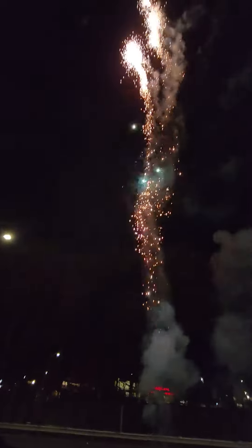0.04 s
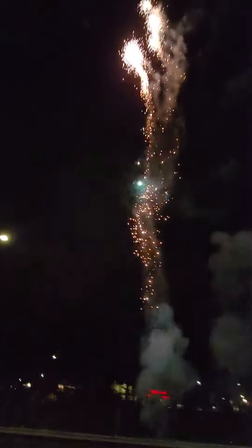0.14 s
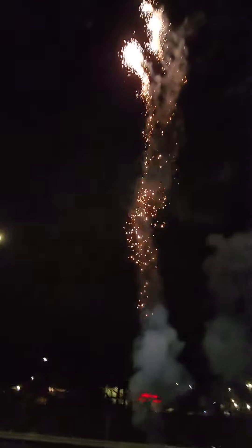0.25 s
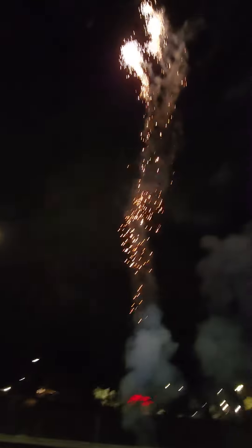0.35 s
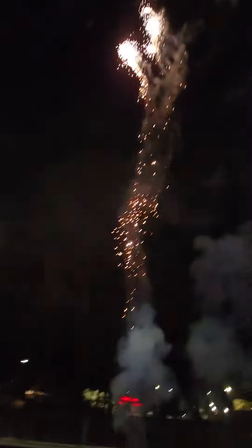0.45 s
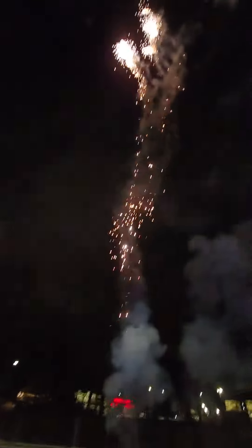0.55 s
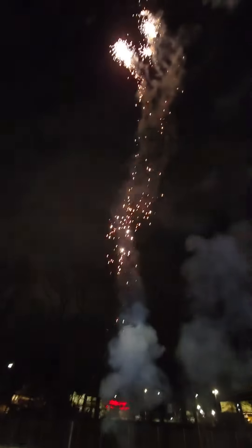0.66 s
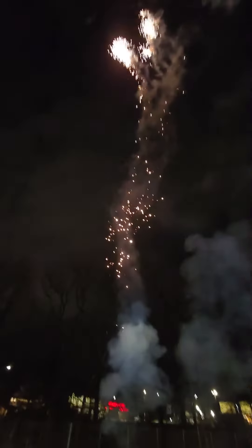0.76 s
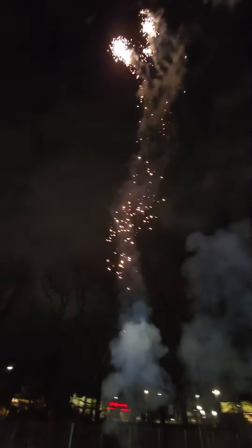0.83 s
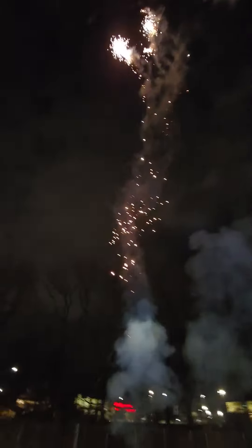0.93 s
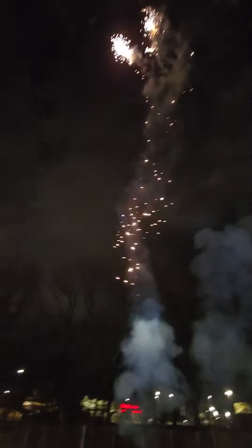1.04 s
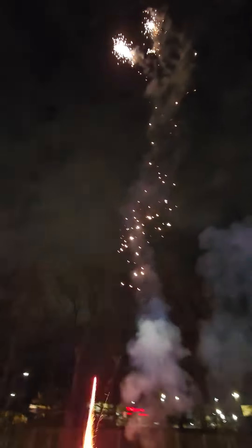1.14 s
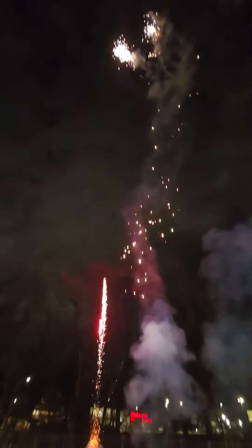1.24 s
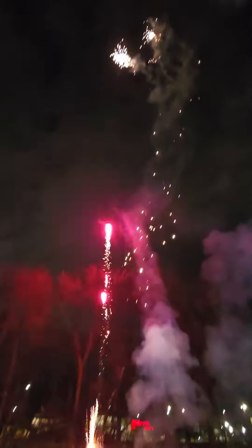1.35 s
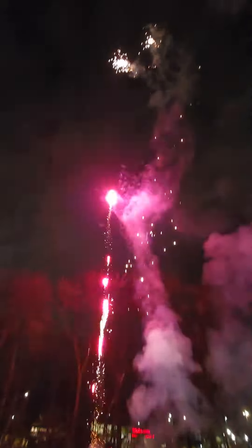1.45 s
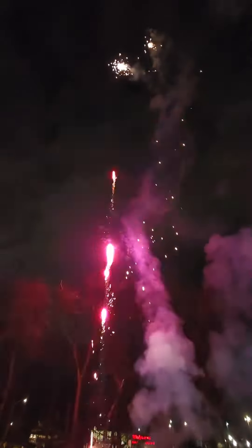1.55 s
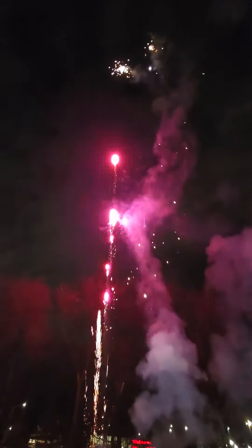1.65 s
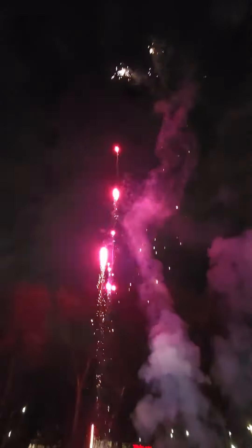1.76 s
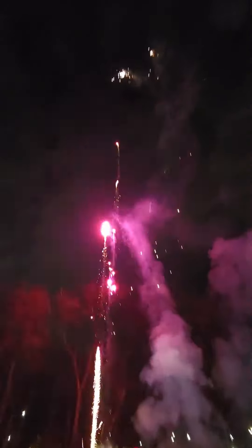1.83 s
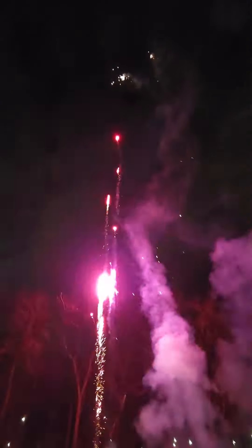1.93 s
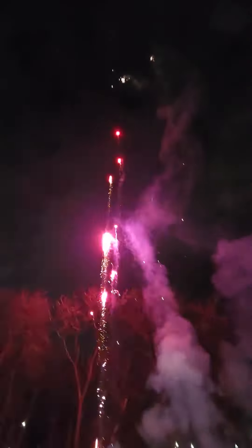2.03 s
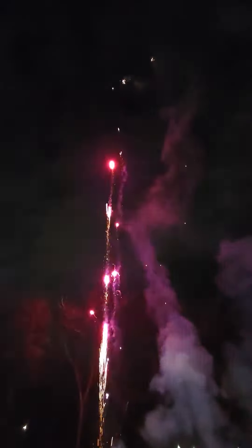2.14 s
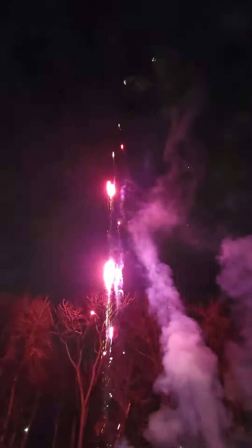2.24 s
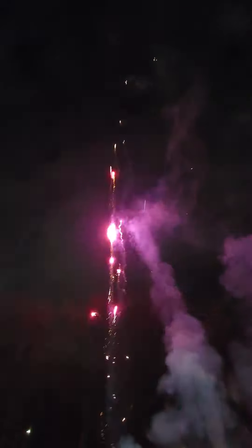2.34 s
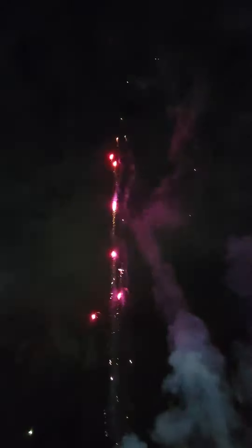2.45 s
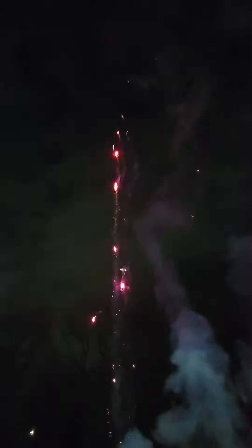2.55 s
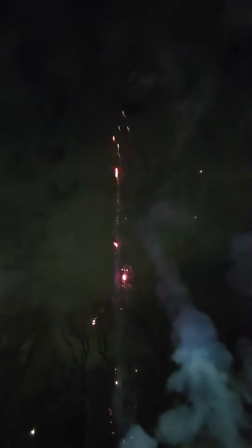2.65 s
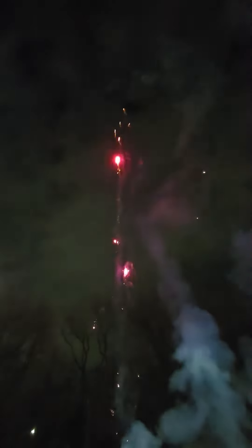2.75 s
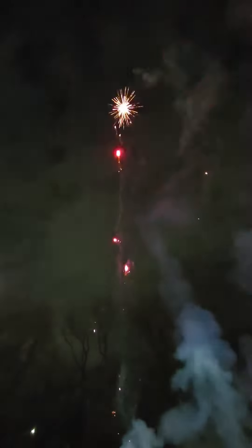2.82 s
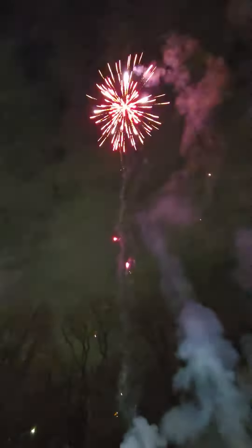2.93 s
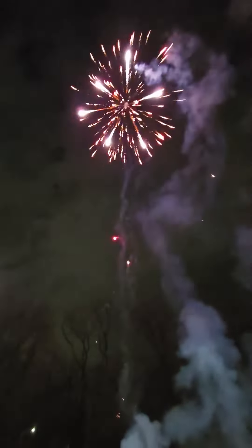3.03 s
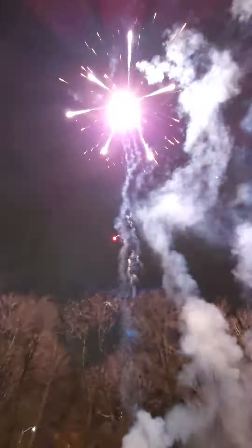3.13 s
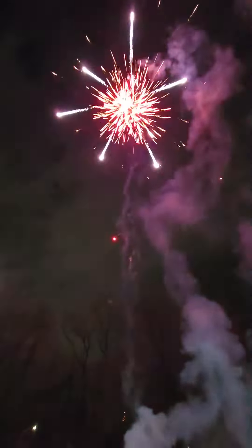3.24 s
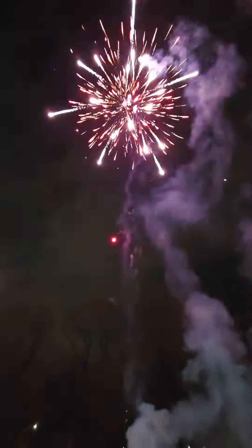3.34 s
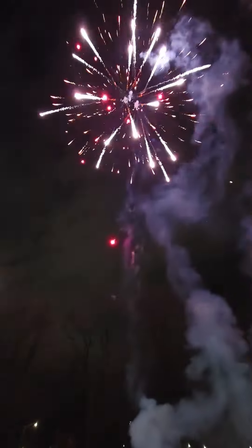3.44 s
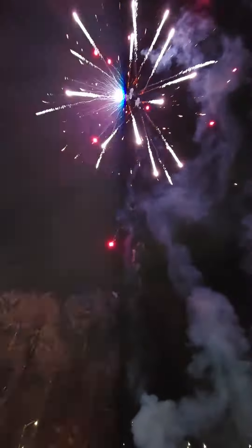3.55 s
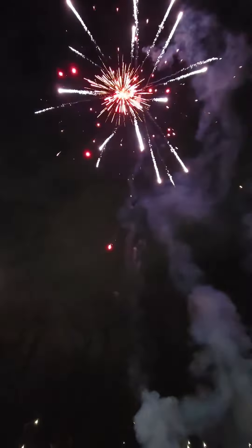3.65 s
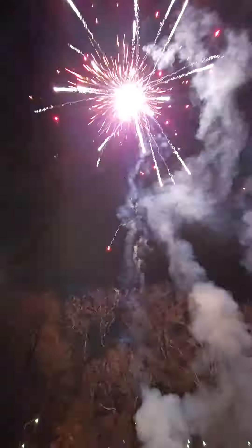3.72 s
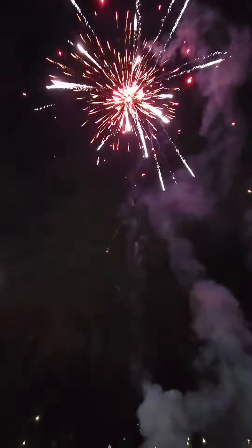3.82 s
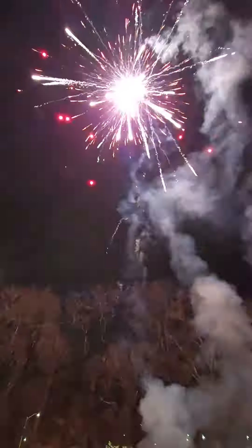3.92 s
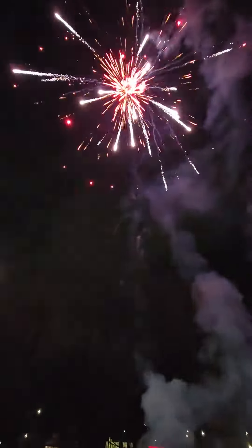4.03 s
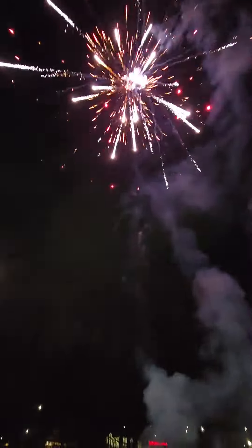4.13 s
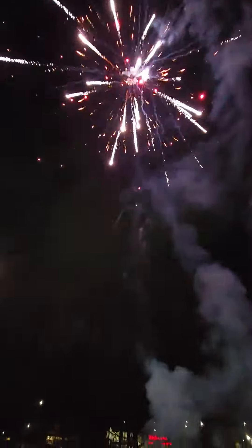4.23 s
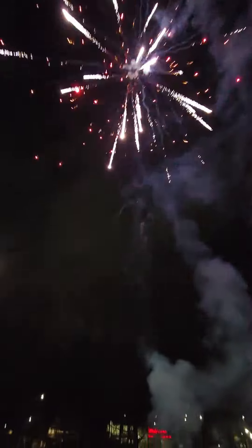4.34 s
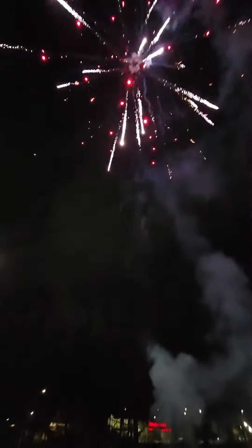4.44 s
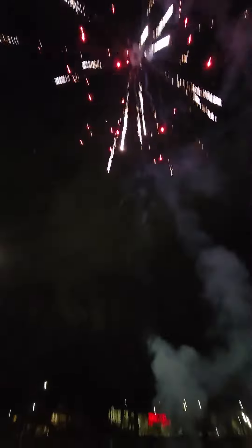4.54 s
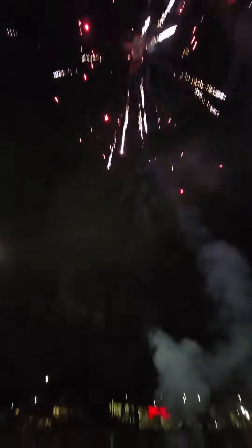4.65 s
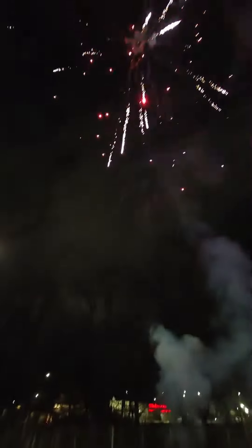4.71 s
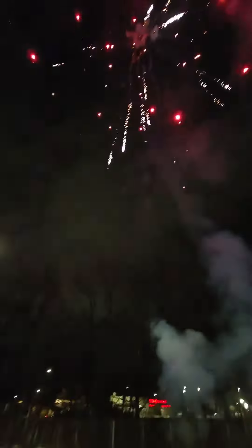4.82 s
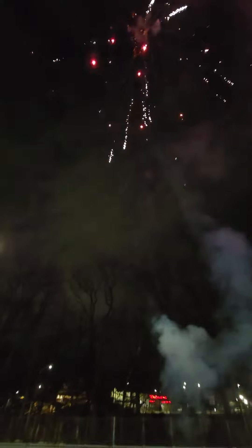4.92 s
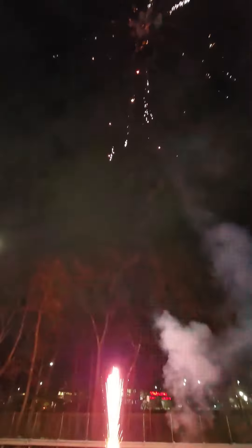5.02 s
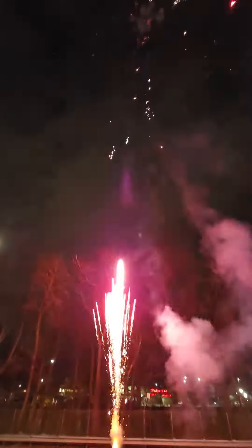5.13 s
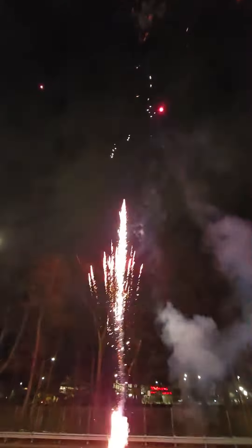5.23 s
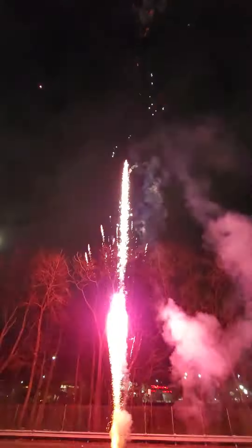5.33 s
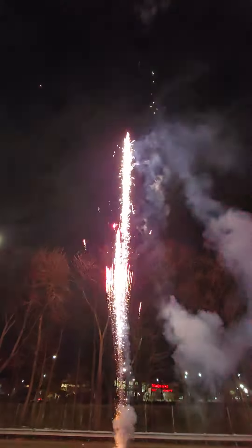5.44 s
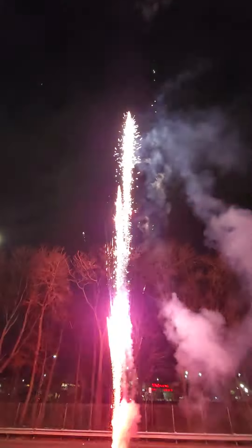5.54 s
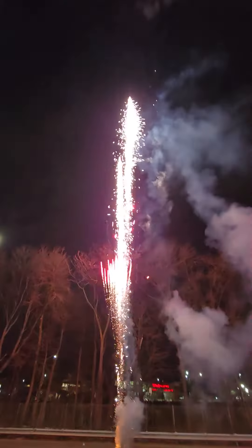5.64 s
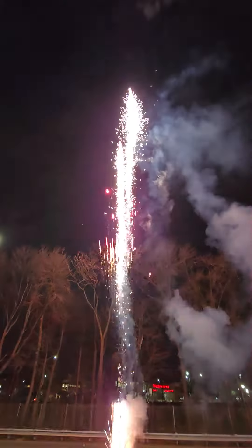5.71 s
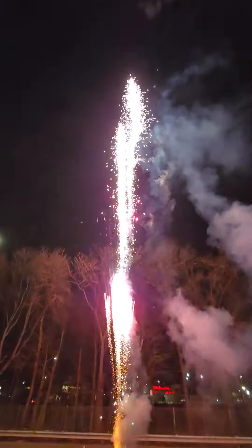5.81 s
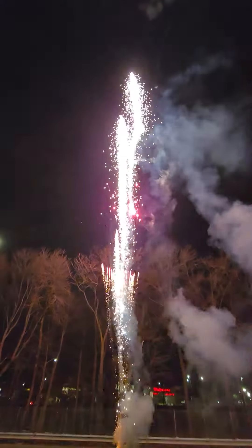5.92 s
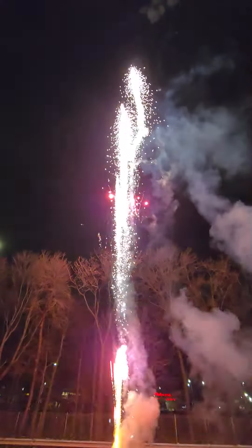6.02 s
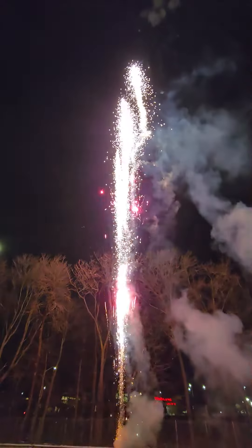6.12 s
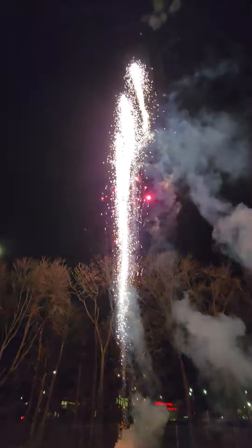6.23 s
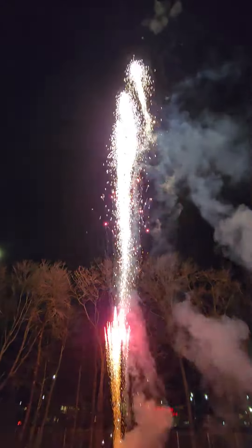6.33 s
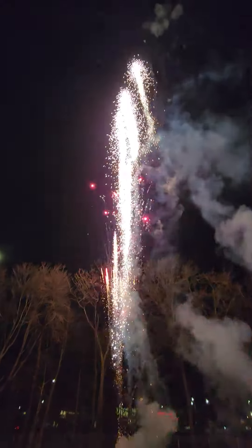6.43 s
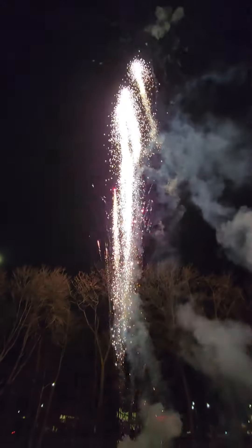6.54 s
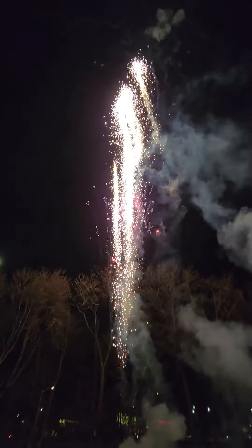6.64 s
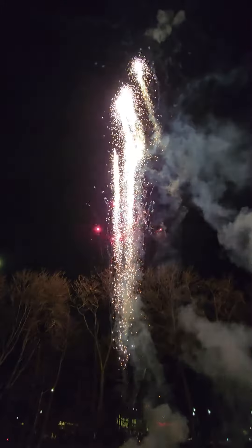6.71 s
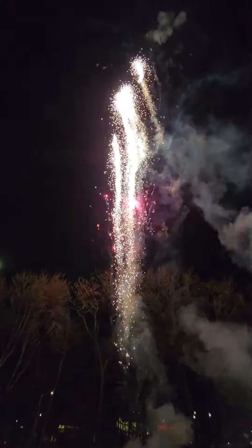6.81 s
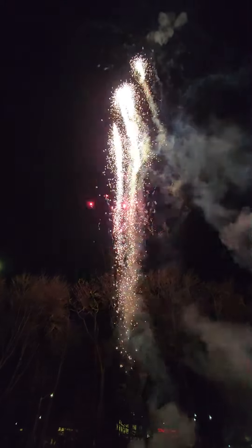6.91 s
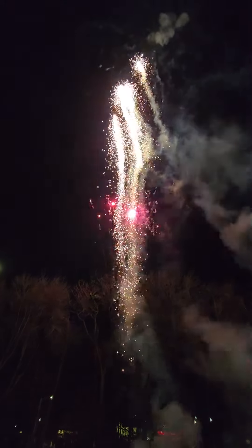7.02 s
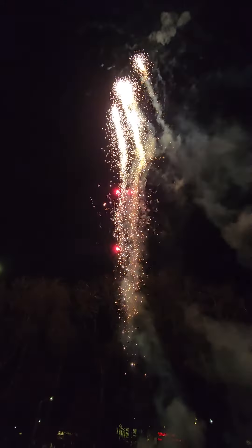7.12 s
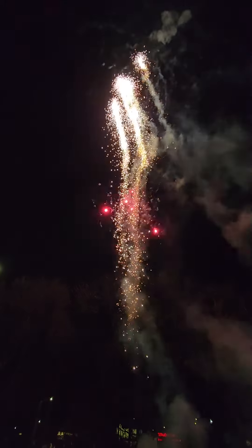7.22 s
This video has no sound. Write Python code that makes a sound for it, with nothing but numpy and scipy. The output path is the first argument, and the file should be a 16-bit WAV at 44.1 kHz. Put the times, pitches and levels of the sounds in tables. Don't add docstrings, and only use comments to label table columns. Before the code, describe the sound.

Glittering firework trails hiss and crackle through wind buffets, then hard launch bangs, sharp aerial bursts and another string of launches echo along a street.

```python
import sys
import numpy as np
from scipy import signal
from scipy.io import wavfile

SR = 44100
rng = np.random.default_rng(int(sys.argv[2]) if len(sys.argv) > 2 else 0)


def dump_mix(stems):
    frames = np.atleast_2d(stems).T
    limited = np.clip(frames, -1, 1)
    pcm = np.round(limited * 32767).astype(np.int16)
    wavfile.write(sys.argv[1], SR, pcm)


def nominal_scale(level):
    x = np.asarray(level, float) / 20
    return 10 ** x


N = 320607

# t/s, shock level/dB, street reply level/dB, fence level/dB
SHELL_LIFTS = [(1.2353, -9.5, -15.5, .5), (1.4372, -8, -20, -2), (1.6576, -8, -20.5, -2.5),
               (1.846, -7.5, -25, .5), (1.9004, -9, -22, 1.5), (2.1185, -7, -24, 1.5)]
BURSTS = [(3.0415, -10, -19, .1), (3.3427, -9, -20.5, .1), (3.3688, -7, -23, .1), (3.8429, -9, -21, .1),
          (3.9729, -5.5, -22, .1), (4.1867, -7.5, -22.5, .1)]
COMET_LIFTS = [(5.1151, -10.5, -29, 4), (5.345, -10, -32.5, -4), (5.5716, -6.5, -29, -2),
               (5.8192, -8, -28.5, -1), (6.083, -9.5, -27.5, 2), (6.3532, -6.5, -25.5, -1)]
# gas swing f/Hz, swing duration/ms, blast level/dB, blast push/ms, ring f/Hz, ring level/dB,
# fizz level/dB, fence level/dB, front dulled above f/Hz
SHELL_PULSE = (275, 4.5, 1, 0.14, 2200.5, -8, -9, -3, 6000)
BURST_PULSE = (367, 3.4, 4, 0.55, 2597.5, -12, -12, -24, 9000)
COMET_PULSE = (243, 4.5, 10.5, 0.3, 3402, -11, -13, -15, 7500)
# delay after the shock/ms, level/dB, lag of left behind right/ms, left-right level/dB, dulled above f/Hz
LIFT_PATHS = [
    (0, 0.5, 0.4157, -2, 14700),
    (3.653, -8, -0.23, -9, 7900),
    (16.57, -2, 0.13, 3.53, 1100),
    (37.4, -5, 0.24, 0, 940),
    (56.6, -17, .1, 7, 410),
    (92.07, -17, -0.0077, -5, 6700),
]
BURST_PATHS = [
    (0, 0.5, -.3, -1.6, 15000),
    (5.94, 2.3, 0.52, 0.42, 15000),
    (10.84, 1, 0.136, 1.5, 610),
    (14.17, -8.5, -0.076, .1, 640),
    (24.5, -14, 0.066, 0.1, 15000),
    (29.89, -8, 0.2, .1, 440),
    (36.3, -10.5, .1, 0.1, 640),
    (41.9, -12.5, 0.17, 0.1, 2200),
]
COMET_PATHS = [
    (0, 0, 0.352, 0.1, 15000),
    (3.33, -13.5, -0.436, 0.1, 5700),
    (16.4, -13, 0.04, 0.1, 820),
    (36.96, -12.5, 0.15, 0.1, 760),
    (55.86, -22, 0.092, 0.1, 550),
]
FENCE_MS, FENCE_SPREAD_MS, FENCE_HZ = 14.2, 7.0, 2200
# delay/ms, level/dB
FENCE_REPEATS = [
    (21, -9),
    (43, -14),
]
# f/Hz, level per Hz/dB
SHELL_REPLY = [(24, -40), (40, -14), (256, 0), (345, -10), (585, -8.5), (1070, -14.5), (1270, -15.5),
               (1600, -14.5), (2100, -17.5), (2440, -20), (3740, -22.5), (16000, -43)]
BURST_REPLY = [(24, -55), (45, -20.5), (110, -13.5), (175, -6), (300, -4), (400, -2.5), (630, -13),
               (950, -15), (1400, -17), (2210, -18.5), (2700, -23.5), (3930, -27), (16000, -46)]
COMET_REPLY = [(24, -45), (40, -24), (249, -2.5), (329, -13), (529, -7.5), (770, -14.5), (1040, -18.5),
               (1340, -22.5), (2050, -20), (3400, -24.5), (16000, -46)]
# f/Hz, near T60/s, far T60/s, far level/dB
GROUND_DECAY = [(60, 1, 2.4, -11), (250, 0.55, 1.33, -13), (1000, 0.81, 1.89, -11), (3000, 0.518, 1.34, -8),
                (8000, 0.55, 0.54, -10.5), (15000, 0.31, 0.54, -8)]
AIR_DECAY = [(60, 0.5, 4.5, 9), (160, 0.16, 3.2, -12), (400, 0.41, 3, -15.5), (1200, 0.33, 3.03, -18),
             (3000, 0.36, 1.89, -10.5), (8000, 0.51, 0.7, -8), (15000, 0.19, .6, -12.5)]
FAR_ROW_MS, FAR_ROW_SPREAD_MS = 99.5, 47
# f/Hz, correlation/1
LIKENESS = [(60, 0.945), (130, 0.976), (290, 0.876), (640, 0.17), (1410, -0.19), (3100, 0.112),
            (6820, 0.0018), (15000, 0.079)]
# f/Hz, left-right level/dB
PORT_BALANCE = [(60, 0), (130, -0.5), (290, -0.5), (640, 1), (1410, -2), (3100, -1), (6820, 2), (15000, 0)]
# f/Hz, width/Hz, lift/dB
PORT_PEAKS = [(2170, 220, 2.2), (3600, 700, 1.2), (1000, 200, 1.2)]
# t/s, hiss level/dB, brightness/(dB per octave)
FADING = [
    (0.0, -25.5, 0.14),
    (0.232, -25.5, 0.35),
    (0.596, -27.5, -0.3),
    (0.828, -29.5, -0.26),
    (1.396, -32.5, -1.2),
    (1.7, -42, -4.5),
]
RISING = [
    (5.15, -69.5, 0.1),
    (5.28, -67, 0.1),
    (5.62, -43.5, 0.091),
    (5.75, -36.5, 0.112),
    (5.91, -34.5, 0.113),
    (6.3, -30, 0.13),
    (6.6, -28.5, 0.097),
    (7.27, -28.5, 0.043),
]
# f/Hz, level per Hz/dB
FADING_HISS = [(40, -17.5), (80, -8), (130, -16), (190, -8.5), (260, -14.5), (450, -6), (882, -5),
               (1360, -3), (2160, 0), (3050, -1.5), (3760, -4), (5500, -6.5), (9070, -12), (15100, -26),
               (17000, -29)]
RISING_HISS = [(60, -30), (110, -18.5), (170, -6), (343, -6.5), (667, -4.5), (1190, -5), (1500, -2.5),
               (2200, -1.5), (3400, -3), (5160, -7), (8940, -8.5), (15000, -16), (17000, -19)]
# f/Hz, level per Hz/dB
NIGHT = [(29, -30.5), (50, -3), (96, -18), (229, -6.5), (337, -25.5), (615, -13.5), (2060, -27),
         (2680, -35), (5810, -49.5), (6390, -50), (16000, -61)]
NIGHT_DB, MIC_HISS_DB = -50.5, -76.5
# f/Hz, width/Hz, level/dB
DRONE = [(185, 30, -46.5), (360, 38.4, -46)]
# peak t/s, level/dB, build-up/ms, sign/1, left-right level/dB
SWELLS = [
    (1.2316, -14, 5.6, 1, -16),
    (1.2362, -15, .9, -1, -16),
    (3.0375, -13, 1.6, -1, -7),
    (5.1135, -22, 2.5, 1, -12),
    (5.1158, -16, .9, -1, -12),
]
# peak t/s, level/dB, build-up/s, fall/(s per 10 dB)
GUSTS = [
    (.1, -46, .05, .3),
    (.33, -25, .04, .1),
    (.43, -29, .06, .045),
    (.8, -52, .05, .15),
    (1.03, -44, .04, .05),
    (6.92, -52, .1, .05),
]
BREEZE_DB, BREEZE_SWAY_DB = -65, 2.5
STIRRED_DB, STIRRED_T60_S = -28, .9
RING_T60_S, FIZZ_MS = 0.011, 2.62
EDGES_HZ = np.geomspace(35, 17000, 20)
STEADY_TOP_HZ, PEAK_TOP_HZ = 16000, 17000


def rms_one(x):
    return x / np.sqrt(np.mean(x ** 2) + 1e-20)


def in_time(rows):
    s, *columns = np.transpose(rows)
    return [np.interp(np.arange(N) / SR, s, c) for c in columns]


def at_hz(points, hz, column=1):
    table = np.array(points)
    return np.interp(np.log(hz), np.log(table[:, 0]), table[:, column])


def drift(rate, size):
    return np.interp(np.arange(size) * (rate / SR), np.arange(300), rng.standard_normal(300))


def low_pass(x, hz):
    return signal.sosfilt(signal.cheby2(16, 45, hz, fs=SR, output="sos"), x)


def bands(sources, gain_at):
    out = 0
    for k, (low, high) in enumerate(zip(EDGES_HZ, EDGES_HZ[1:])):
        band = signal.butter(2, [low, high], "band", fs=SR, output="sos")
        mid, side = signal.sosfilt(band, sources[k % 2])
        hz = np.sqrt(low * high)
        alike = np.clip(at_hz(LIKENESS, hz), -1, 1)
        lean = nominal_scale(at_hz(PORT_BALANCE, hz) * np.array([[.5], [-.5]]))
        pair = np.sqrt(1 + alike) * mid + np.sqrt(1 - alike) * side * [[1], [-1]]
        out = out + gain_at(hz) * lean * pair
    return low_pass(out, STEADY_TOP_HZ)


def night():
    murmur = bands(rng.standard_normal((2, 2, N)), lambda hz: nominal_scale(at_hz(NIGHT, hz)))
    return nominal_scale(NIGHT_DB) * rms_one(murmur)


def wind():
    common, own = rng.standard_normal((2, N))
    rumble = signal.butter(1, [22, 45], "band", fs=SR, output="sos")
    low = signal.sosfilt(rumble, [common, common + 1.34 * own])
    low = signal.lfilter(*signal.butter(2, 90, fs=SR), low)
    t = np.arange(N) / SR
    level = nominal_scale(BREEZE_DB + BREEZE_SWAY_DB * drift(5.0, size=N))
    for s, db, build_s, die_s in GUSTS:
        fall_db = np.where(t < s, 20 * ((s - t) / build_s) ** 2, 10 * (t - s) / die_s)
        level += nominal_scale(db - fall_db)
    for s, _, reply_db, _ in SHELL_LIFTS + BURSTS + COMET_LIFTS:
        level += (t > s) * nominal_scale(reply_db + STIRRED_DB - 60 * np.abs(t - s) / STIRRED_T60_S)
    return nominal_scale(-5.5) * level * rms_one(low) * nominal_scale(np.array([[-2.5], [2.5]]))


def drone():
    out = 0
    for hz, width, db in DRONE:
        narrow = signal.butter(2, [hz - width / 2, hz + width / 2], "band", fs=SR, output="sos")
        tone = rms_one(signal.sosfilt(narrow, rng.standard_normal(N)))
        out = out + nominal_scale(db + 1.8 * drift(6.6, size=N)) * tone
    return out * np.clip((1.25 - np.arange(N) / SR) / 0.437, 0, 1)


def comets(burn, colour, whole_db, sparks_per_s, spark_db, spread_db, direct_db, lag_ms, patchy_db):
    first, last = int(burn[0][0] * SR), min(int(burn[-1][0] * SR), N)
    level_db, tilt_db = [c[first:last] for c in in_time(burn)]
    size = last - first

    born, strength, sign = rng.random((3, N))[:, first:last]
    clumps = nominal_scale(2.5 * drift(60, size=size))
    popping = born < clumps * sparks_per_s / SR
    sparks = popping * nominal_scale(-spread_db * np.log(strength + .03)) * np.sign(sign - .3)

    direct = nominal_scale(spark_db) * rms_one(sparks) + nominal_scale(direct_db) * rng.standard_normal(N)[first:last]
    left = np.roll(direct, int(round(lag_ms * SR / 1000)))
    mid_side = np.array([left + direct, left - direct]) / 2
    source = rng.standard_normal((2, 2, N))[..., first:last] + mid_side
    flare = drift(9.04, size=size)

    def flickering(hz):
        flicker_db = patchy_db * (.4 * flare + drift(25.03, size=size))
        return nominal_scale(at_hz(colour, hz) + tilt_db * np.log2(hz / 3000) + flicker_db)

    roar = rms_one(bands(source, flickering))
    return np.pad(nominal_scale(level_db + whole_db) * roar, ((0, 0), (first, N - last)))


def swells():
    out = np.zeros((2, N))
    for s, db, build_ms, sign, pan_db in SWELLS:
        ahead_ms = (s - np.arange(N) / SR) * 1000
        ears = nominal_scale(pan_db * np.array([[.5], [-.5]]))
        width_ms = np.where(ahead_ms > 0, build_ms, .6)
        out += np.sign(sign) * nominal_scale(db) * ears / ears.mean() * np.exp(-(ahead_ms / width_ms) ** 2)
    return out


def street(colour, decay, row_db):
    t = np.arange(int(1.7 * SR)) / SR
    lumps = nominal_scale(1.46 * drift(140, size=len(t)) + 1.33 * drift(45.38, size=len(t)))
    lumps *= nominal_scale(row_db * np.exp(-((1000 * t - FAR_ROW_MS) / FAR_ROW_SPREAD_MS) ** 2))

    def dying(hz):
        near_t60, far_t60, far_db = [at_hz(decay, hz, column) for column in (1, 2, 3)]
        fall = nominal_scale(-60 * t / near_t60) + nominal_scale(far_db - 60 * t / far_t60)
        return nominal_scale(at_hz(colour, hz)) * fall / fall[SR // 12]

    onset = np.clip((t - .003) / 0.015, 0, 1)
    reply = bands(rng.standard_normal((2, 2, len(t))), dying) * lumps * onset
    return reply / np.sqrt(np.mean(reply[:, :SR // 8] ** 2))


def ring(x, hz):
    r, w = nominal_scale(-60 / (RING_T60_S * SR)), 2 * np.pi * hz / SR
    return signal.lfilter([0, np.sin(w)], [1, -2 * r * np.cos(w), r * r], x)


def fence(ms):
    into = (ms - 1 - FENCE_MS) / FENCE_SPREAD_MS
    envelope = np.sin(np.pi * np.clip(into, 0, 1) ** .6) ** .8
    first = rng.standard_normal((2, len(ms))) * envelope
    rattle = first + sum(nominal_scale(db) * np.roll(first, int(later_ms * SR / 1000), axis=1)
                         for later_ms, db in FENCE_REPEATS)
    broad = signal.lfilter(*signal.butter(1, [1200, 5000], "band", fs=SR), rattle)
    return 0.11 * ring(rattle, FENCE_HZ) + 0.67 * broad


def shock(pulse, paths, slats_db, size=4800):
    swing_hz, swing_ms, blast_db, push_ms, ring_hz, ring_db, fizz_db, fence_db, front_hz = pulse
    ms = np.arange(size) / SR * 1000
    wave = np.cos(2 * np.pi * swing_hz * np.arange(size) / SR) * np.exp(-(ms / swing_ms) ** 2)
    wave += nominal_scale(blast_db) * (1 - ms / push_ms) * np.exp(-ms / push_ms)
    wave += nominal_scale(ring_db) * ring(ms == 0, ring_hz * rng.uniform(0.92, 1.08))
    out = np.zeros((2, size))
    for after_ms, db, lag_ms, pan_db, dull_hz in paths:
        lag_ms = lag_ms + 0.0338 * rng.standard_normal()
        dulling = signal.butter(1, min(dull_hz, front_hz, .45 * SR), fs=SR)
        for ear, side in enumerate((.5, -.5)):
            fizz = nominal_scale(fizz_db) * rng.standard_normal(size) * np.exp(-ms / FIZZ_MS)
            dulled = signal.lfilter(*dulling, wave + fizz)
            arrival_ms = ms - 1 - after_ms - side * lag_ms
            out[ear] += nominal_scale(db + side * pan_db) * np.interp(arrival_ms, ms, dulled, 0)
    return out + nominal_scale(fence_db + slats_db) * fence(ms)


def volley(blasts, pulse, paths, colour, decay, row_db):
    late, out = street(colour, decay, row_db), np.zeros((2, 2 * N))
    for s, shock_db, reply_db, slats_db in blasts:
        i = int(np.round((s - .001) * SR))
        early = shock(pulse, paths, slats_db)
        out[:, i:i + early.shape[1]] += nominal_scale(shock_db) * early
        out[:, i:i + late.shape[1]] += nominal_scale(reply_db) * late
    return out[:, :N]


def ports(x):
    for hz, width_hz, db in PORT_PEAKS:
        x = x + (nominal_scale(db) - 1) * signal.lfilter(*signal.iirpeak(hz, hz / width_hz, fs=SR), x)
    return x


def scene():
    trails = comets(FADING, FADING_HISS, whole_db=4.3, sparks_per_s=1100, spark_db=3.0, spread_db=6.0,
                    direct_db=-7.0, lag_ms=-0.389, patchy_db=.9)
    trails += comets(RISING, RISING_HISS, whole_db=6.6, sparks_per_s=2700, spark_db=-7, spread_db=3.5,
                     direct_db=-5.0, lag_ms=-0.31, patchy_db=0.46)
    blasts = volley(SHELL_LIFTS, SHELL_PULSE, LIFT_PATHS, SHELL_REPLY, GROUND_DECAY, row_db=4.5)
    blasts += volley(BURSTS, BURST_PULSE, BURST_PATHS, BURST_REPLY, AIR_DECAY, row_db=2.5)
    blasts += volley(COMET_LIFTS, COMET_PULSE, COMET_PATHS, COMET_REPLY, GROUND_DECAY, row_db=-1.2)
    return night() + wind() + drone() + trails + swells() + blasts


def top_cut(x):
    return signal.sosfilt(signal.butter(12, 17020, fs=SR, output="sos"), x)


def record(dry):
    hiss = nominal_scale(MIC_HISS_DB) * low_pass(rng.standard_normal(dry.shape), STEADY_TOP_HZ)
    rounded = .8 * np.tanh((ports(dry) + hiss) / .8)
    return top_cut(low_pass(rounded, PEAK_TOP_HZ))


dry = scene()
out = record(dry)
dump_mix(out)
```